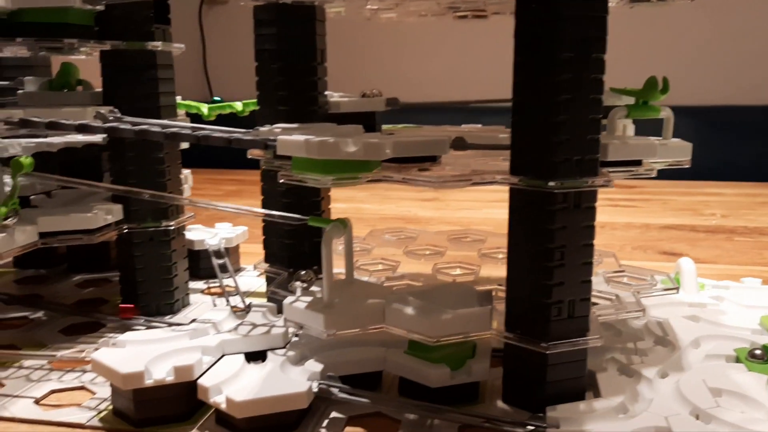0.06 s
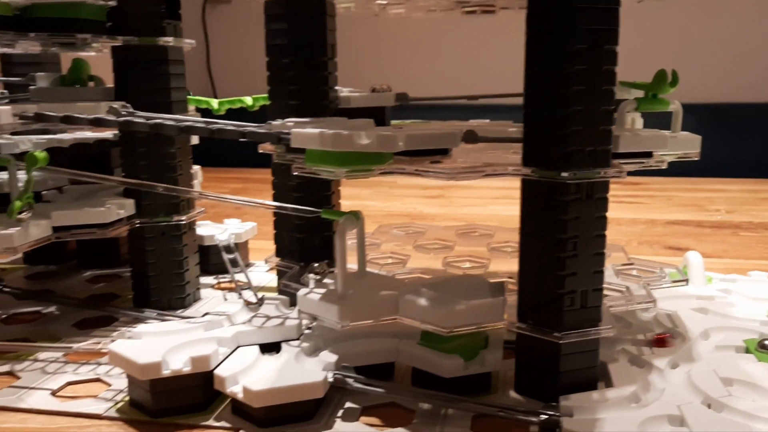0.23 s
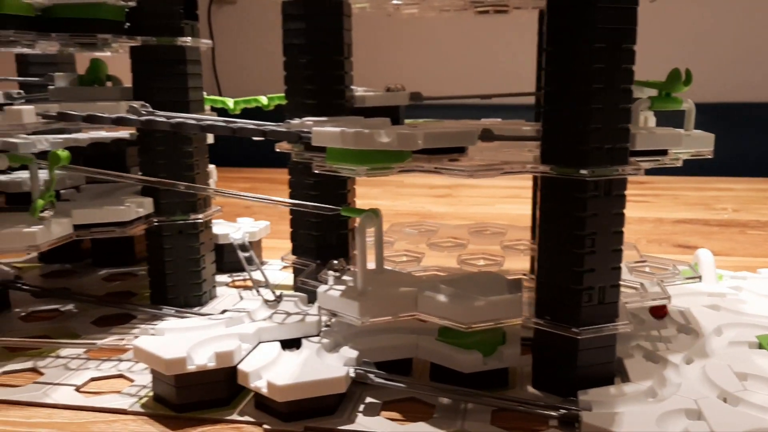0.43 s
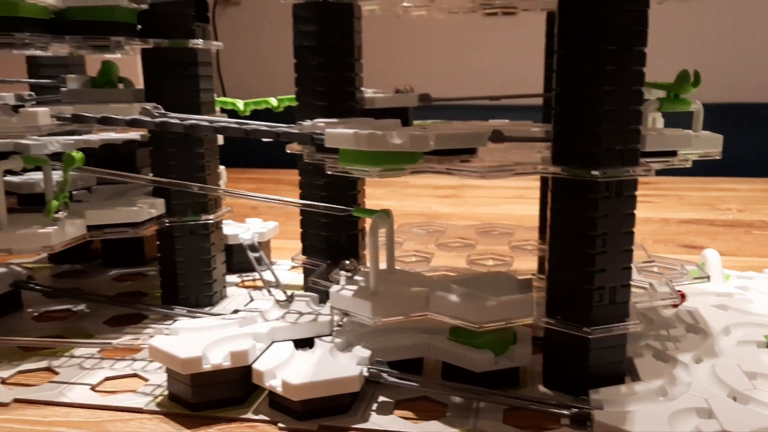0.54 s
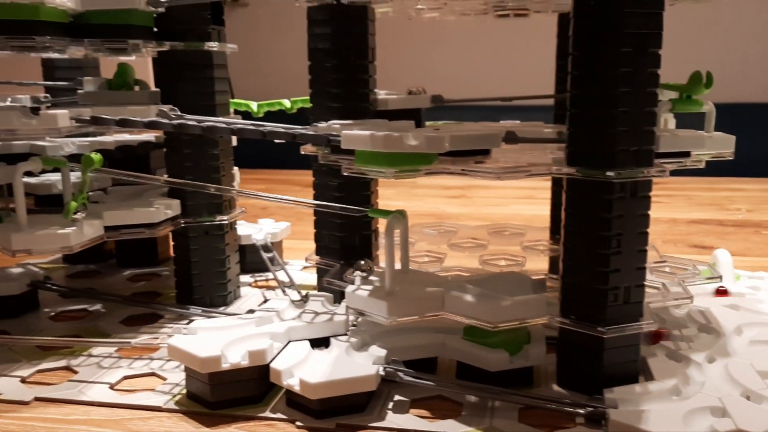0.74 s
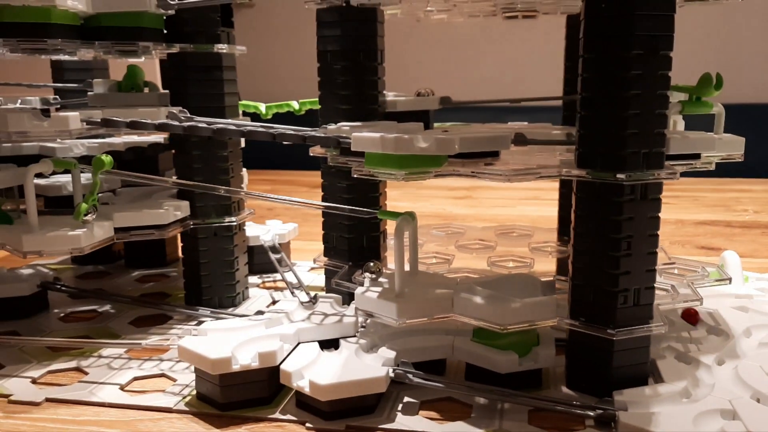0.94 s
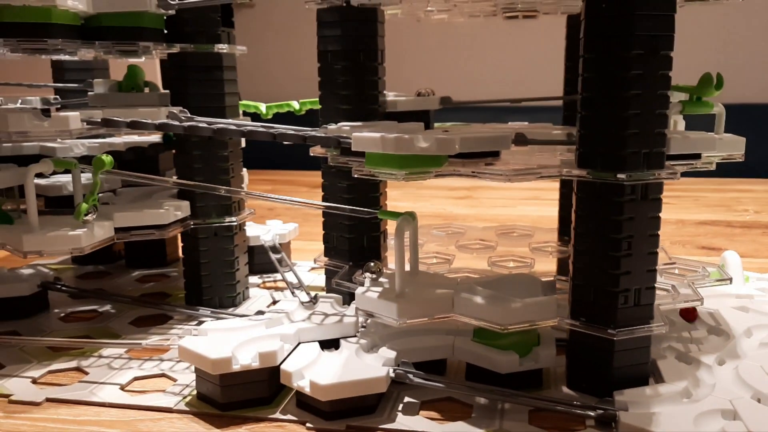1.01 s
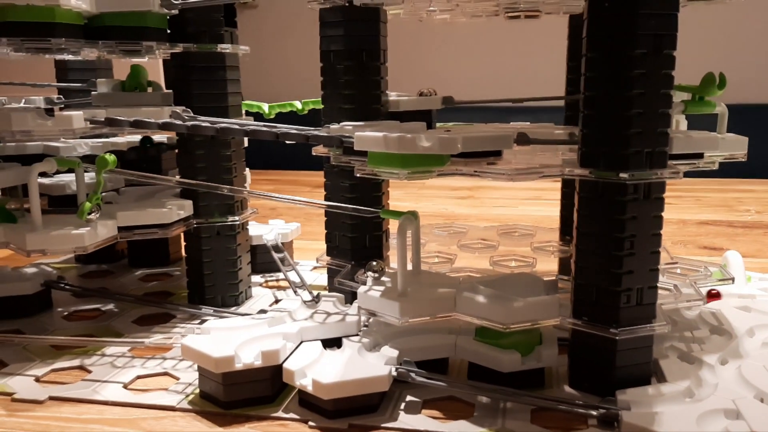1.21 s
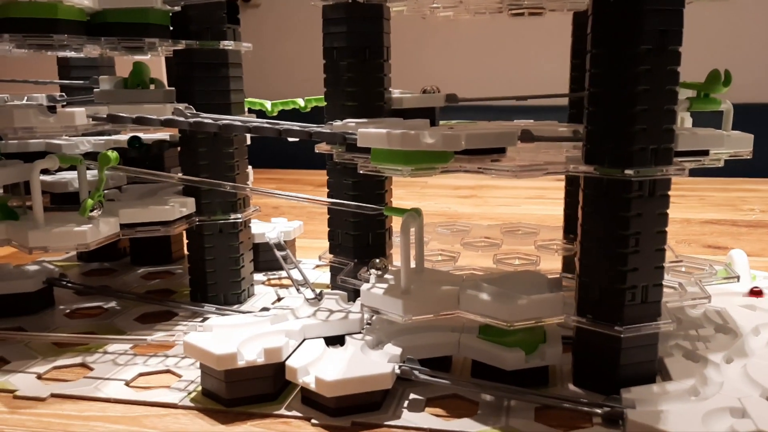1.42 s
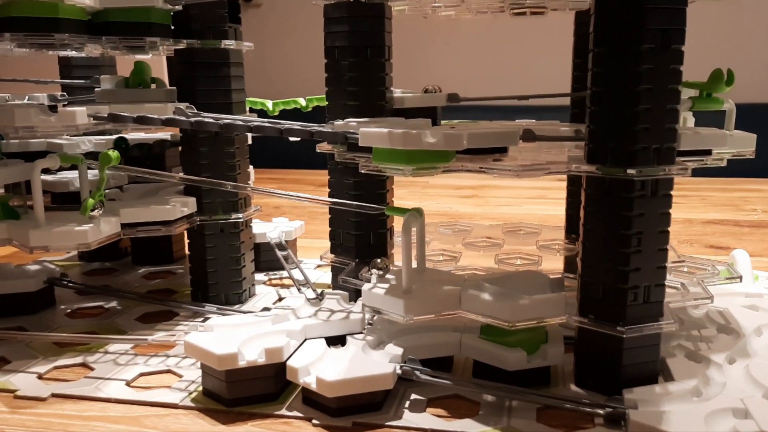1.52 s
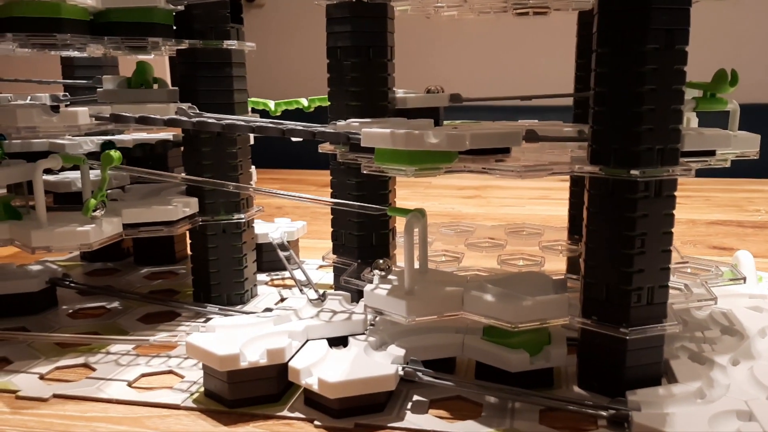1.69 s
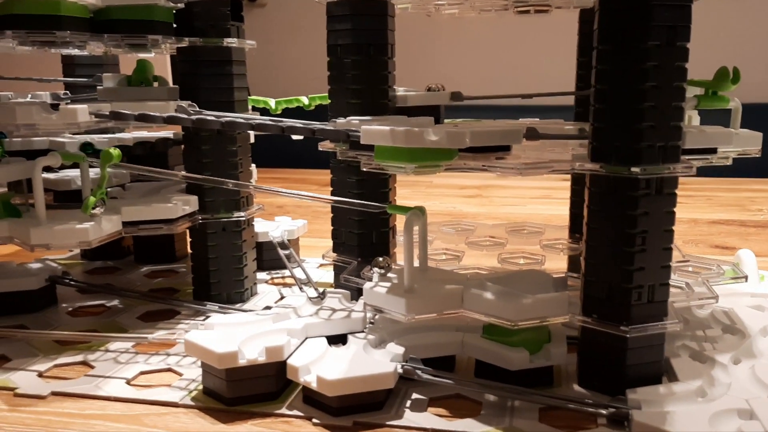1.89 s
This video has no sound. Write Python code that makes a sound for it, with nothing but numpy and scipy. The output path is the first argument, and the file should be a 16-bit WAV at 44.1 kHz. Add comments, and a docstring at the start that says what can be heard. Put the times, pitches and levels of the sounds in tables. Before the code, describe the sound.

A marble rattles along a plastic track, lands with a sharp clack, then clicks softly.

```python
"""Marble on a plastic track

A marble rolls down a plastic track on a table, close by in an echoing room. Tiny bumps under it
make the rails and base plate rumble. It ticks over the joints and sets the tiles ringing, then
lands with a sharp double clack that makes the table boom softly. A smaller click follows, and
the marble rolls on faintly with a few light taps."""
import sys
import numpy as np
from scipy import signal
from scipy.fft import rfft, irfft
from scipy.io import wavfile

SR = 44100
rng = np.random.default_rng(int(sys.argv[2]) if len(sys.argv) > 2 else 0)


def inscribe(sig):
    """Save sig as 16-bit PCM at rate SR to the path in sys.argv[1].

    A 1-D sig is mono; a 2-D sig holds one channel per row.
    Samples are clipped to [-1, 1] before scaling.
    """
    pcm = np.round(np.clip(np.atleast_2d(sig).T, -1, 1) * 32767)
    wavfile.write(sys.argv[1], SR, pcm.astype(np.int16))


N = 85995

# Levels are relative. Pan is left minus right. T60 is the time to fade by 60 dB.
# tone colours, or how strong each pitch is (f/Hz, level/dB)
AIR_COLOUR = [(20, -22), (60, 3), (110, 4), (200, -5), (600, -1.5), (2000, -26.5), (8000, -14.5),
              (16000, -29)]
TABLE_COLOUR = [(30, -21), (70, -12), (110, 5.5), (170, -4), (250, 5), (330, -3.5), (16000, -105)]
RAIL_COLOUR = [(60, -27.5), (250, -35.5), (400, -30), (850, -19), (1250, -7.5), (1600, 3.5), (2100, -16),
               (4000, -17.5), (7500, -24), (9400, -31), (16000, -33.5)]
PLATE_COLOUR = [(40, -23.5), (130, -10.5), (265, -19), (345, 1), (430, 1), (600, 2.5), (1100, 5.5),
                (2100, 3), (2700, -4.5), (3400, -4.5), (5000, -12.5), (8000, -21), (9400, -45.5),
                (16000, -30.5)]
FAR_COLOUR = [(100, -24.5), (400, -13), (650, 0), (950, 7.5), (1300, 0.5), (1650, 3), (2150, -7.5),
              (3000, -13.5), (4200, -22.5), (8000, -29), (9500, -33), (16000, -23)]  # the track further along
SING_COLOUR = [(2600, -33), (3250, 3), (3650, 0), (4400, -35.5)]  # a rail's thin singing note
DRY_TICK_COLOUR = [(300, -17.5), (1500, -5), (4000, 2.5), (5500, 0), (7500, -5), (9300, -14), (11500, 3.5),
                   (13000, -7), (14500, -2), (16000, 5.5)]
JOINT_COLOUR = [(200, -27.5), (900, -4.5), (2000, 0.5), (4000, 5.5), (4900, -5.5), (5800, 4), (8000, 0),
                (9300, -13), (11000, -2), (12700, -6.5), (16000, -5.5)]
CRACK_COLOUR = [(200, -32), (1000, 3), (2400, 8.5), (3300, 10), (4200, 8), (5500, 8.5), (8000, 9),
                (9400, -1), (11000, 5), (16000, -0.5)]  # the sharp part of a clack
BODY_COLOUR = [(50, -35), (200, -33.5), (320, -0.5), (450, -10.5), (690, 2), (800, -5.5), (940, 0.5),
               (1200, 0.5), (1500, -1.5), (1900, 4.5), (2400, -11), (5000, -42), (16000, -26)]  # its hollow part
# how long the room echoes (f/Hz, T60/s)
ROOM_DECAY = [(150, 0.67), (400, 0.71), (900, 0.73), (2200, 0.61), (8000, 0.43), (15000, 0.38)]
# how the two microphones differ (f/Hz, pan/dB)
MIC_BALANCE = [(60, 9.5), (180, 0.5), (350, 1.5), (700, 2), (1100, 4), (1600, 1.5), (2300, 3.5), (3300, -3),
               (4500, 2), (6000, -3), (8000, 1.5), (10500, 3), (13000, -2), (15500, 0.5)]
# how loudly each part sounds as the marble rolls (t/s, level/dB)
RAIL_LEVELS = [(0, -43.5), (0.191, -47.5), (0.261, -38), (.31, -50.5), (0.399, -42.5), (.55, -52.5),
               (.7, -42.5), (.79, -56.5), (.87, -42.5), (.91, -68.5), (0.949, -52), (1.05, -54.5),
               (1.121, -86), (1.95, -91)]
PLATE_LEVELS = [(0, -46), (.08, -59.5), (0.191, -69), (.29, -50), (.36, -43), (.45, -39.5), (.475, -47.5),
                (0.518, -34), (0.599, -48), (0.721, -40.5), (.8, -59), (.88, -51), (0.931, -42.5),
                (.97, -50), (1.01, -41.5), (1.06, -46.5), (1.199, -47.5), (1.5, -91), (1.95, -68.5)]
FAR_LEVELS = [(0, -71), (1.248, -77), (1.36, -62), (1.47, -65.5), (1.55, -71.5), (1.619, -60), (1.7, -66),
              (1.77, -62), (1.85, -80), (1.95, -75)]
SING_LEVELS = [(1.55, -90), (1.68, -75), (1.9, -79)]
# light touches on a rail (t/s, level/dB, f/Hz)
PINGS = [(0.3942, -46, 4990), (0.4236, -43.5, 4600), (.5104, -39, 3530), (0.5611, -46.5, 4540),
         (1.585, -67, 4800), (1.6026, -61.5, 3900), (1.6581, -66, 4650), (1.8062, -74, 4700),
         (1.8861, -69, 4780)]
# ticks right by the microphones (t/s, level/dB, pan/dB)
DRY_TICKS = [(0.3932, -39, -3), (0.8196, -36.5, 13.5), (0.982, -40.5, -16), (0.9932, -36, -1),
             (1.2960, -37, 10.5)]
# hits on joints and rail walls (t/s, tick level/dB, tile level/dB, tile f/Hz)
JOINT_HITS = [(.004, -41.5, -51, 1540), (0.2212, -37, -40, 1390), (0.2265, -40, -38.5, 1490),
              (0.2477, -34, -36, 1590), (0.2537, -38.5, -33, 1640), (0.322, -36.5, -36, 1714),
              (0.327, -36.5, -42, 1680), (0.3479, -35, -38, 1640), (.354, -47.5, -33, 1690),
              (0.3641, -35.5, -23, 1578), (0.3817, -44, -40, 1690), (0.3957, -38, -59, 1570),
              (0.4239, -36.5, -44, 1610), (0.4769, -44.5, -32, 1670), (.489, -35.5, -34, 1740),
              (0.4936, -35.5, -30, 1896), (0.512, -37.5, -51, 1830), (0.5182, -49, -30, 1535),
              (.523, -51, -41, 1510), (0.5615, -59, -37, 1180), (.6368, -40.5, -34.5, 2110),
              (0.6828, -38.5, -35, 2200), (0.6872, -36, -49, 1860), (0.7157, -48, -37.5, 1450),
              (0.811, -48.5, -36, 1654), (.8182, -32, -31, 1625), (.837, -36, -32, 1630),
              (0.857, -58, -36.5, 1630), (0.9347, -48, -32.5, 1600), (0.9816, -42.5, -37.5, 1590),
              (0.9946, -44, -43.5, 1530), (1.393, -62, -45.5, 1620), (1.4451, -71.5, -48, 1323),
              (1.570, -73, -54.5, 950), (1.586, -61, -68, 1600), (1.658, -64, -60.5, 1590),
              (1.739, -67.5, -55.5, 1733), (1.806, -64.5, -63, 1650)]
# a tile's modes, the notes it rings at (multiple of the tile's pitch, level/dB)
TILE_MODES = [(.86, -19.5), (1, 9.5), (1.13, -7)]
# modes of the landing piece, a square knock and a glancing clink (f/Hz, level/dB, T60/s)
LANDING_MODES = [(331, -16.5, 0.24), (704, -17.5, 0.51), (940, -19, .45), (1155, -8, .4), (1690, -10, 0.18),
                 (1887, -10, .25), (3090, -0.5, 0.093), (3180, -13.5, .13), (4985, -17.5, 0.32),
                 (6505, -20.5, 0.97), (8200, -6.5, 0.1), (8330, -5, .17), (12714, -17, .28)]
KNOCK_MODES = [(620, 1, 0.015), (873, 3.5, .018), (1487, 1, 0.018)]
CLINK_MODES = [(3360, 3.5, 0.01), (7980, 3, 0.015)]
# the landing and later clicks (t/s, crack level/dB, body level/dB, knock level/dB, clink level/dB, pan/dB)
CLACKS = [(1.0638, -20, -24, -27, -34, 1.5), (1.0705, -29, -33, -38, -36, -9),
          (1.0846, -22, -30.5, -34, -26.5, -2), (1.0985, -25, -28, -36, -46, 1),
          (1.3071, -41, -47.5, -36.5, -47, -3.5), (1.3135, -38.5, -51, -59, -58, 1.5),
          (1.321, -46, -69, -56, -68, 15.5), (1.330, -43, -51.5, -47, -51, 6.5),
          (1.6011, -62, -59.5, -53, -65, -4)]

ATTACK_S, CONTACT_ATTACK_S = .00097, .00019
MIC_PHASE_TURNS, CONTACT_PHASE_TURNS = .27, .21  # how far left and right are out of step


def gain(db):
    """Turn decibels into a factor to multiply by."""
    return 10 ** (np.asarray(db) / 20)


def unit(x):
    """Scale to an average strength (rms) of 1."""
    return x / np.sqrt(np.mean(x ** 2))


def unit_hit(x):
    """Scale a hit to the energy of 5 ms at an rms of 1."""
    return x / np.sqrt(np.mean(np.sum(x ** 2, axis=-1)) / (.005 * SR))


def pan(db):
    """Left and right gains; positive leans left."""
    return gain(np.array([[db], [-db]]) / 2)


def at_pitch(hz, points):
    """Read between a table's rows on a log frequency scale."""
    freqs, values = np.array(points).T
    return np.interp(np.log(hz + 1), np.log(freqs), values)


def colour(x, points, size=4096):
    """Filter a sound to give it a tone colour."""
    hz = np.arange(size // 2 + 1) * SR / size
    cepstrum = irfft(np.log(gain(at_pitch(hz, points))))
    # fold the filter so that nothing sounds before a hit
    cepstrum[1:size // 2] *= 2
    cepstrum[size // 2 + 1:] = 0
    response = irfft(np.exp(rfft(cepstrum)))
    return signal.fftconvolve(x, response[None], axes=1)[:, :x.shape[1]]


def spread(pair, alike_below_hz=760):
    """Turn two unrelated signals into left and right: alike in the bass, apart in the treble."""
    n = pair.shape[1]
    hz = np.arange(n // 2 + 1) * SR / n
    alike = .85 / (1 + (hz / alike_below_hz) ** 4)
    mid, side = rfft(pair)
    mid, side = mid * np.sqrt(1 + alike), side * np.sqrt(1 - alike)
    return irfft(np.array([mid + side, mid - side]), n)


def noise(n):
    """An even stereo hiss, n samples long."""
    return spread(rng.standard_normal((2, n)))


def fade(t, t60, attack):
    """Rise quickly, then die away."""
    return (1 - np.exp(-t / attack)) * np.exp(-np.log(1000) * t / t60)


def add(out, start, x):
    """Mix x in at a start time in seconds."""
    i = max(int(start * SR), 0)
    out[:, i:i + x.shape[1]] += x[:, :max(N - i, 0)]


def crack(t60, points, snap_db=6, snap_t60=.009):
    """A blow on plastic: a snap, then so many short modes that they blur into noise."""
    t = np.arange(SR // 8) / SR
    envelope = fade(t, t60, ATTACK_S) + gain(snap_db) * fade(t, snap_t60, ATTACK_S)
    hiss = spread(rng.choice([-1., 1.], (2, len(t))))
    return unit_hit(colour(hiss * envelope, points))


def ring(modes, attack, turns=MIC_PHASE_TURNS):
    """Fading notes that reach the two microphones a little out of step."""
    t = np.arange(SR // 2) / SR
    sound = 0
    for hz, db, t60 in modes:
        phase = rng.random() + turns * rng.choice([-1, 1]) * np.array([[0], [1]])
        sound += gain(db) * fade(t, t60, attack) * np.sin(2 * np.pi * (hz * t + phase))
    return sound


def air():
    """The room's air makes a faint, low, steady rush."""
    return gain(-72.5) * unit(colour(noise(N), AIR_COLOUR))


def room_echo(x, rise_s=.0009):
    """Sound bounces off table and track, then around the room, where the treble dies first."""
    t = np.arange(SR) / SR
    spectrum = rfft(noise(SR))
    octaves_hz = 125 * 2. ** np.arange(8)
    tail = 0
    for hz, weights in zip(octaves_hz, np.eye(8)):
        band = at_pitch(np.arange(spectrum.shape[1]), list(zip(octaves_hz, weights)))
        tail += irfft(spectrum * band, SR) * fade(t, at_pitch(hz, ROOM_DECAY), rise_s)
    early = noise(SR) * fade(t, t60=.42, attack=rise_s)
    response = (gain(-6.5) * unit(tail) + gain(-12.5) * unit(early)) / np.sqrt(2 * SR)
    return signal.fftconvolve(x[None], response, axes=1)[:, :N]


def table_boom(t60=.28, rise_s=.052):
    """The first heavy blow sets the table booming; the boom builds up and lingers."""
    start, _, body_db, *_ = CLACKS[0]
    t = np.arange(SR) / SR
    envelope = fade(t, t60, rise_s) * (1 - np.exp(-t / rise_s)) ** 2
    boom = unit(colour(noise(SR), TABLE_COLOUR)) * envelope
    out = np.zeros((2, N))
    add(out, start, gain(body_db - 10.5) * boom)
    return out


def rolling(points, levels, bumps_per_s=2600):
    """Tiny bumps of uneven size under the marble shake a part of the track."""
    hits = rng.random(N) < bumps_per_s / SR
    sizes = gain(-np.minimum(rng.exponential(size=N), 4))
    bumps = hits * sizes * rng.choice([-1, 1], (2, N))
    level_db = np.interp(np.arange(N) / SR, *np.array(levels).T)
    return unit(colour(spread(bumps), points)) * gain(level_db)


def base_plate(hz=342, t60=.13):
    """The rumble travels into the base plate and rings its low, hollow note."""
    rumble = rolling(PLATE_COLOUR, PLATE_LEVELS)
    pole = np.exp((2j * np.pi * hz - np.log(1000) / t60) / SR)
    note = signal.lfilter([1], [1, -pole], rumble).imag  # a filter that rings at one pitch
    return (rumble + unit(note) * rumble.std() * gain(-22)) * pan(-.5)


def rail_pings(t60=.049):
    """A light touch rings one high note of a rail."""
    out = np.zeros((2, N))
    for start, db, hz in PINGS:
        ping = ring([(hz, 0, t60)], CONTACT_ATTACK_S, CONTACT_PHASE_TURNS)
        add(out, start, gain(db) * unit_hit(ping))
    return out


def dry_ticks(t60=.032):
    """Tiny hard contacts, so close that no echo is heard."""
    out = np.zeros((2, N))
    for start, db, pan_db in DRY_TICKS:
        add(out, start, gain(db) * crack(t60, DRY_TICK_COLOUR) * pan(pan_db))
    return out


def tile_rings(t60=.037):
    """The tile at each joint rings briefly at its own pitch, with a rough edge."""
    out = np.zeros((2, N))
    for start, _, tile_db, hz in JOINT_HITS:
        modes = [(hz * ratio, db, t60) for ratio, db in TILE_MODES]
        note = unit_hit(ring(modes, attack=.0009))
        rasp = crack(t60, [(hz / 8, -40), (hz / 2, -6), (hz, 0), (hz * 2, -14), (hz * 4, -35)])
        add(out, start, gain(tile_db) * note * pan(1.5))
        add(out, start, gain(tile_db - 7) * rasp)
    return out


def joint_ticks(tick_t60=.058, ring_t60=.048, range_hz=(3890, 7060)):
    """Each joint the marble hits gives a bright tick with three high notes of its own."""
    out = np.zeros((2, N))
    for start, tick_db, _, _ in JOINT_HITS:
        modes = [(hz, 0, ring_t60) for hz in rng.uniform(*range_hz, 3)]
        add(out, start, gain(tick_db - 10.5) * unit_hit(ring(modes, ATTACK_S)))
        add(out, start, gain(tick_db) * crack(tick_t60, JOINT_COLOUR))
    return out * pan(1.5)


def landing_ring():
    """The piece the marble lands on rings after each clack, off to the left."""
    out = np.zeros((2, N))
    for start, crack_db, *_ in CLACKS:
        add(out, start, gain(crack_db - 17) * ring(LANDING_MODES, ATTACK_S))
    return out * pan(16.5)


def clacks(crack_t60=.066, body_t60=.081, low_cut_hz=380):
    """Hard blows: a sharp crack and a hollow body, with a short knock and clink at contact."""
    thin = signal.butter(2, low_cut_hz, "high", fs=SR, output="sos")  # a small piece gives little bass
    out = np.zeros((2, N))
    for start, crack_db, body_db, knock_db, clink_db, pan_db in CLACKS:
        sharp = gain(crack_db) * crack(crack_t60, CRACK_COLOUR)
        body = gain(body_db) * crack(body_t60, BODY_COLOUR)
        knock = signal.sosfilt(thin, ring(KNOCK_MODES, CONTACT_ATTACK_S, CONTACT_PHASE_TURNS))
        clink = ring(CLINK_MODES, CONTACT_ATTACK_S, CONTACT_PHASE_TURNS)
        contact = gain(knock_db) * unit_hit(knock) + gain(clink_db) * unit_hit(clink)
        add(out, start, (sharp + body) * pan(pan_db))
        add(out, start, contact * pan(pan_db))
    return out


def scene():
    """Mix the marble and its track with the echo, the table and the air."""
    track = rolling(RAIL_COLOUR, RAIL_LEVELS) + base_plate() + rolling(FAR_COLOUR, FAR_LEVELS)
    track += joint_ticks() + clacks() + rolling(SING_COLOUR, SING_LEVELS)
    rings = tile_rings() + rail_pings()
    direct = track + rings + dry_ticks() + landing_ring()
    left, right = track + gain(-2) * rings  # only these parts echo
    return direct + room_echo(left) + room_echo(right) + table_boom() + air()


def record(dry, low_cut_hz=58, high_cut_hz=15700):
    """The two microphones differ in tone colour; the deep bass and highest treble are cut."""
    left = colour(dry[:1], [(hz, db / 2) for hz, db in MIC_BALANCE])
    right = colour(dry[1:], [(hz, -db / 2) for hz, db in MIC_BALANCE])
    low_cut = signal.butter(2, low_cut_hz, "high", fs=SR, output="sos")
    high_cut = signal.ellip(8, .2, 70, high_cut_hz, fs=SR, output="sos")
    heard = signal.sosfilt(low_cut, np.vstack([left, right]))
    return signal.sosfilt(high_cut, heard)


dry = scene()
out = record(dry)
inscribe(out)
```